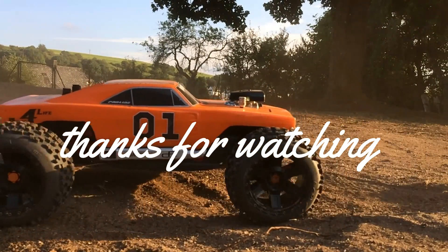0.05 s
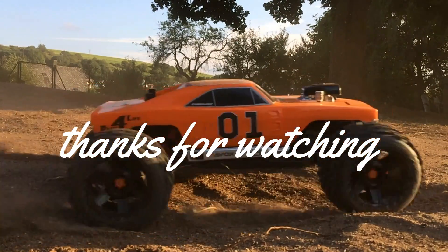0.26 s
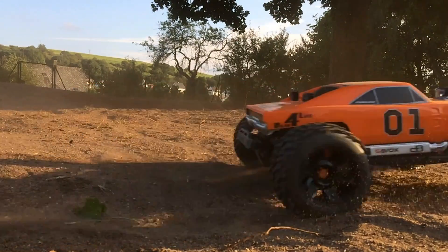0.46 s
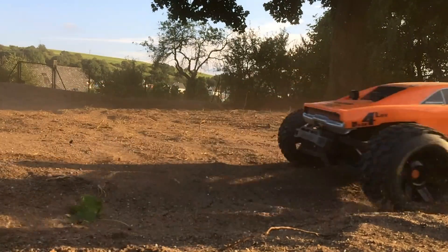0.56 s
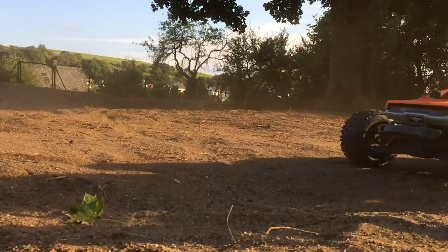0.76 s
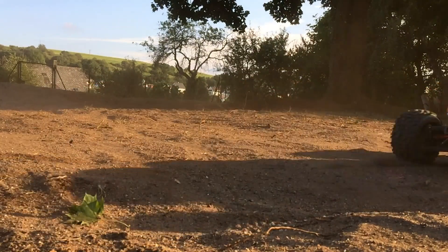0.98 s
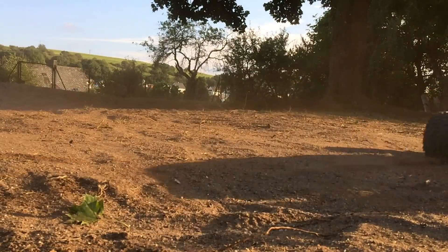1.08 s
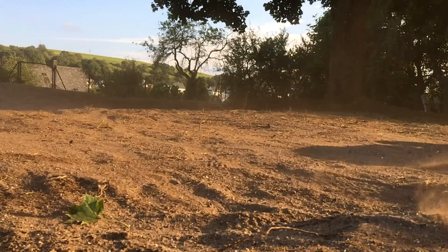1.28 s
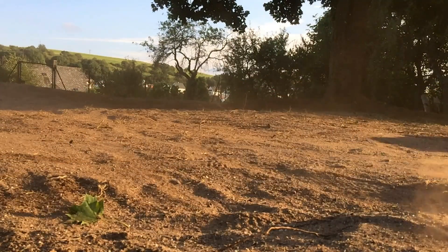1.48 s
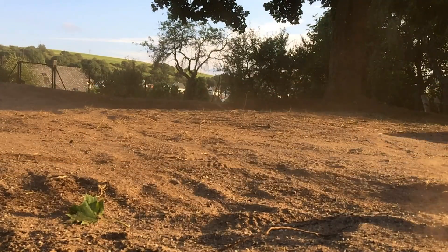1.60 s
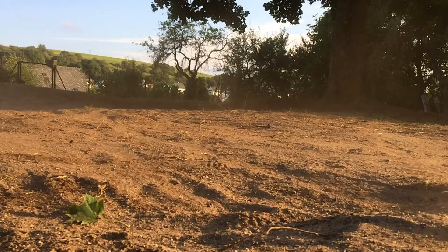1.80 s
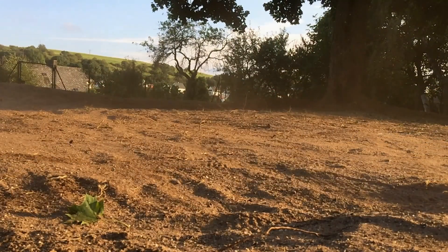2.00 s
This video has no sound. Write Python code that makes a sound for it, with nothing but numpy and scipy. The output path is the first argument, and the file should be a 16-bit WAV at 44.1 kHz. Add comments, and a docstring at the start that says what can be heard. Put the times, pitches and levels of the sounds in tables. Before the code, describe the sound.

Outdoors, near the microphone, a toy truck's gears squawk and whine upward, tyres rumble and fling grit, it eases off, then jolts into another raspy whining burst that breaks up and fades.

```python
"""Outdoors on loose dirt, a radio-controlled truck stutters, launches, coasts, then surges away.
Its brushless motor drives whining gears: gliding, rasping tones that set a plastic chassis ringing.
Random ticks make the drivetrain rattle; filtered noise and clicks make tyre rumble and thrown grit.
Short squawks, booming tyre bumps, a speed controller whistle, a faint chirp and quiet air complete it."""
import sys
import numpy as np
from scipy import signal
from scipy.fft import rfft, irfft
from scipy.io import wavfile

SR = 44100
rng = np.random.default_rng(int(sys.argv[2]) if len(sys.argv) > 2 else 0)


def output_pcm(signal):
    """Save a mono or channel-first signal as 16-bit PCM at the path in sys.argv[1].

    Samples are clipped to [-1, 1] before scaling.
    """
    pcm = np.clip(np.atleast_2d(signal).T, -1, 1) * 32767
    wavfile.write(sys.argv[1], SR, np.round(pcm).astype(np.int16))


N = 90404  # length in samples


def from_db(db):
    """Turn decibels into a gain."""
    return 10 ** (np.asarray(db) / 20)


def rms_one(x):
    """Scale a signal to an average strength (rms) of 1."""
    return x / np.sqrt(np.mean(x ** 2) + 1e-20)


def seconds():
    """Give the time of every sample."""
    return np.arange(N) / SR


def in_time(rows):
    """Join the points of a time table with straight lines; one curve per column after the time."""
    start_s, *columns = np.transpose(rows)
    return [np.interp(seconds(), start_s, column) for column in columns]


def coloured(x, points):
    """Shape the spectrum of a steady signal by a table of pitches and levels; rms 1."""
    pitch_hz, level_db = np.transpose(points)
    bins_hz = np.maximum(np.arange(N // 2 + 1) * SR / N, 1)
    shape_db = np.interp(np.log(bins_hz), np.log(pitch_hz), level_db)
    return rms_one(irfft(rfft(x) * from_db(shape_db), N))


def drift(rate_hz):
    """Make a smooth random wander of rms 1: noise that weakens above the given rate."""
    bins_hz = np.arange(N // 2 + 1) * SR / N
    noise = rng.standard_normal(N)
    return rms_one(irfft(rfft(noise) / (1 + (bins_hz / rate_hz) ** 2), N))


def ring(clicks, pitch_hz, t60_s):
    """Let clicks excite a resonance: a unit click starts a tone of height 1 that falls 60 dB in t60_s."""
    decay = from_db(-60 / (t60_s * SR))
    turn = 2 * np.pi * pitch_hz / SR  # radians per sample
    return signal.lfilter([.5, 0, -.5], [1, -2 * decay * np.cos(turn), decay * decay], clicks + 1e-18)


def grains(per_s, spread_db):
    """Scatter clicks at random times, with uneven sizes and random signs."""
    sizes = from_db(spread_db * np.minimum(rng.exponential(1, N), 4.5))
    happens = rng.random(N) < per_s / SR
    return sizes * rng.choice([-1, 1], N) * happens


TURN_S, TURN_LENGTH_S = 1.164, 0.32  # middle and length of the swing of the tail


def turned():
    """Follow the turn: 0 while the truck is side-on, 1 once its tail faces the listener."""
    return np.clip((seconds() - TURN_S) / TURN_LENGTH_S + .5, 0, 1)


def turning(x, side_on, tail_on):
    """Fade from the side-on colour to the tail-on colour as the truck turns away."""
    return (1 - turned()) * coloured(x, side_on) + turned() * coloured(x, tail_on)


# Colour of the open air: pitch_hz, level_db (relative)
AIR_COLOUR = [(30, 3), (70, 20), (150, -10), (1400, -49), (3500, -45), (15000, -24)]
AIR_DB = -56


def air():
    """Steady noise, strongest in the bass, stands for the open air."""
    return from_db(AIR_DB) * coloured(rng.standard_normal(N), AIR_COLOUR)


# Loudness of the speed controller whistle: start_s, level_db
WHISTLE = [(.76, -82), (.79, -48), (.945, -54), (.975, -33), (1.005, -31), (1.035, -42), (1.06, -100)]
WHISTLE_HZ, WHISTLE_WIDTH_HZ = 13870, 188


def controller():
    """Switching in the speed controller whistles: a narrow tone made unsteady by two random wanders."""
    phase = 2 * np.pi * WHISTLE_HZ * seconds()
    whistle = drift(WHISTLE_WIDTH_HZ / 2) * np.sin(phase) + drift(WHISTLE_WIDTH_HZ / 2) * np.cos(phase)
    return from_db(in_time(WHISTLE)[0]) * rms_one(whistle)


# Bumps hit by a hollow tyre: start_s, pitch_hz, level_db
BUMPS = [(0.274, 142.4, -30), (.413, 199.4, -31.5), (.507, 288, -25.5), (.515, 427, -24), (1.859, 80, -37)]
BUMP_T60_S = 0.17  # time to fall by 60 dB


def bumps():
    """Each bump sets the air in a hollow tyre booming: a low tone that dies away."""
    booms = np.zeros(N)
    for start_s, pitch_hz, level_db in BUMPS:
        age_s = np.maximum(seconds() - start_s, 0)
        level = from_db(level_db - 60 * age_s / BUMP_T60_S)
        booms = booms + level * np.sin(2 * np.pi * pitch_hz * age_s)
    return booms


# Loudness of the tyres on the ground: start_s, level_db
RUMBLE = [(.14, -56.5), (.22, -56), (.28, -36.5), (.37, -36), (.44, -28.5), (.52, -29.5), (.6, -45.5),
          (.68, -50.5), (.78, -43), (.99, -50), (1.035, -30.5), (1.25, -34), (1.5, -37), (1.56, -38.5),
          (1.78, -46.5), (1.93, -42), (2.05, -49)]
# Colour of that rumble: pitch_hz, level_db (relative)
RUMBLE_COLOUR = [(40, -15), (110, -8), (210, 2), (290, 2.5), (430, -2), (650, -5.5), (1500, -21.5)]


def tyre_rumble():
    """Knobbly tyres drum on the ground: low noise that follows a loudness curve."""
    return from_db(in_time(RUMBLE)[0]) * coloured(rng.standard_normal(N), RUMBLE_COLOUR)


# Loudness of grit thrown by the tyres: start_s, level_db
SPRAY = [(.15, -58), (.165, -45), (.224, -55.5), (.231, -30), (.3, -24), (.46, -28), (.58, -42),
         (.65, -54.5), (.76, -52), (.778, -42.5), (.86, -48), (.954, -50.5), (.959, -38), (1.022, -31),
         (1.029, -21.5), (1.1, -28), (1.28, -29), (1.34, -30), (1.385, -36.5), (1.445, -35.5),
         (1.462, -29.5), (1.51, -30.5), (1.55, -37), (1.61, -41.5), (1.665, -36), (1.7, -40), (1.92, -45.5),
         (2.05, -55)]
# Colour of the grit, side-on and then tail-on: pitch_hz, level_db (relative)
SPRAY_COLOUR = [(900, -36), (2000, -3), (2800, 0), (3600, -5.5), (5900, -2), (7900, -6.5), (11000, -14),
                (15300, -25)]
SPRAY_COLOUR_AWAY = [(900, -10), (2200, 1), (3200, -1), (4400, -5.5), (6300, -7), (9000, -10), (14200, -10)]
# Resonances of the thin side panels: pitch_hz, level_db (relative)
PANELS = [(3050, -3.5), (3880, -1), (4980, 1.5), (6500, -2), (7120, -6)]
PANEL_T60_S, GRIT_RING_DB = 0.028, -11  # fall by 60 dB; panel pings against the grit
GRAINS_PER_S, GRAIN_SPREAD_DB = 10000, 1.5


def grit_spray():
    """Tyres fling clumps of grit: dense random clicks, with panel pings that fade out over the turn."""
    grit = turning(grains(GRAINS_PER_S, GRAIN_SPREAD_DB), SPRAY_COLOUR, SPRAY_COLOUR_AWAY)
    pings = rms_one(sum(from_db(db) * ring(grit, hz, PANEL_T60_S) for hz, db in PANELS))
    grit_and_pings = grit + from_db(GRIT_RING_DB) * (1 - turned()) * pings
    clumps_db = 1.48 * drift(58)
    return from_db(in_time(SPRAY)[0] + clumps_db) * grit_and_pings


# Resonances of the plastic chassis, also used by jolts and whines: pitch_hz, level_db (relative), t60_s
CHASSIS = [(444, -6, 0.26), (577, -12.5, 0.13), (677, -11.5, 0.21), (810, 4.5, 0.18), (968, -10.5, .12),
           (1107, -7.5, 0.19), (1416, -4, 0.098), (1551, 0, .12), (1809, -6.5, 0.055)]
# Loudness of the drivetrain rattle under load: start_s, level_db
RATTLE = [(.148, -56.5), (.163, -30), (.2, -37), (.224, -37), (.231, -19.5), (.29, -21.5), (.35, -23),
          (.42, -24), (.47, -22), (.53, -32), (.6, -43.5), (.74, -45), (.78, -31), (.81, -39.5),
          (.955, -42), (.959, -35.5), (.99, -29.5), (1.018, -34), (1.032, -13.5), (1.06, -30.5),
          (1.15, -24), (1.22, -27.5), (1.37, -30), (1.425, -29), (1.475, -28.5), (1.56, -38), (1.62, -33),
          (1.665, -40.5), (1.71, -37.5), (1.93, -39), (2.05, -47)]
# Colour of the ticks, side-on and then tail-on: pitch_hz, level_db (relative)
RATTLE_COLOUR = [(200, -45), (420, -6), (700, 3.5), (1400, 2.5), (1900, -3), (2400, -5), (3000, -35),
                 (9000, -75)]
RATTLE_COLOUR_AWAY = [(200, -48), (420, -5), (700, -1), (1100, 1), (2400, -2), (3000, -10), (5000, -24),
                      (9000, -66)]
RATTLES_PER_S, RATTLE_SPREAD_DB = 2500, -1.5
CHASSIS_RING_DB = -8  # ringing against the ticks


def chassis_rattle():
    """Dense drivetrain ticks are heard directly and also set the plastic chassis ringing."""
    load = from_db(in_time(RATTLE)[0] + 1.08 * drift(21))
    ticks = grains(RATTLES_PER_S, RATTLE_SPREAD_DB)
    rings = np.zeros(N)
    for k, (pitch_hz, level_db, t60_s) in enumerate(CHASSIS):
        sign = (-1) ** k  # neighbouring resonances alternate in sign
        rings = rings + sign * from_db(level_db) * ring(ticks, pitch_hz, t60_s)
    direct = turning(ticks, RATTLE_COLOUR, RATTLE_COLOUR_AWAY)
    return load * (direct + from_db(CHASSIS_RING_DB) * rms_one(rings))


# Jolts through the chassis: start_s, level_db
JOLTS = [(0.256, -24), (0.773, -35.5), (1.027, -25.5), (1.032, -19.5)]


def chassis_jolts():
    """Each single jolt strikes every chassis resonance at once, with random signs."""
    start_s, jolt_db = np.transpose(JOLTS)
    out = np.zeros(N)
    for pitch_hz, level_db, t60_s in CHASSIS:
        clicks = np.zeros(N)
        clicks[(start_s * SR).astype(int)] = from_db(jolt_db + level_db) * rng.choice([-1, 1], len(start_s))
        out = out + ring(clicks, pitch_hz, t60_s)
    return out


# Short squawks of the gears: two in the stutter, three as they slip at launch: start_s, length_s, level_db
SNATCHES = [(0.159, 0.015, -31.5), (0.179, 0.029, -29.5), (0.298, 0.0026, -4), (0.31, 0.0038, -7.5),
            (0.321, .004, -12)]
SNATCH_HZ, SNATCH_ATTACK_S, SNATCH_RELEASE_S = 1385, 0.0018, 0.0022


def snatches():
    """The gears snatch as short squawks near 1.4 kHz, unsteady in pitch."""
    t = seconds()
    level = np.zeros(N)
    for start_s, length_s, level_db in SNATCHES:
        attack = np.clip((t - start_s) / SNATCH_ATTACK_S, 0, 1)
        release = np.exp(-np.maximum(t - start_s - length_s, 0) / SNATCH_RELEASE_S)
        level = level + from_db(level_db) * attack * release
    pitch_hz = SNATCH_HZ * (1 + 0.017 * drift(126))
    return level * rms_one(np.sin(2 * np.pi * np.cumsum(pitch_hz) / SR))


WHINE_WOBBLE, WHINE_ROUGH = 0.01805, 0.38  # spread of pitch and of level, as shares
WHINE_FLUTTER_PER_S, SKIRT_HZ = 110, 352  # rates of the level flutter and of the rasp


def gear_tone(pitch_hz, rasp_share):
    """Meshing teeth make a tone that wobbles in pitch, flutters in level and rasps on both sides."""
    phase = 2 * np.pi * np.cumsum(pitch_hz * (1 + WHINE_WOBBLE * drift(80.2))) / SR
    tone = (1 + WHINE_ROUGH * drift(WHINE_FLUTTER_PER_S)) * np.sin(phase)
    rasp = drift(SKIRT_HZ) * np.sin(phase) + drift(SKIRT_HZ) * np.cos(phase)
    return rms_one(tone + rasp_share * rasp)


def whine(curve, rasp_share, pairs=()):
    """A gliding gear tone sounds with its weaker partners for as long as its curve lasts."""
    t = seconds()
    pitch_hz, level_db = in_time(curve)
    tones = gear_tone(pitch_hz, rasp_share)
    for ratio, pair_db in pairs:
        tones = tones + from_db(pair_db) * gear_tone(ratio * pitch_hz, rasp_share)
    lasting = (t > curve[0][0]) * (t < curve[-1][0])
    return from_db(level_db) * rms_one(tones) * lasting


WHINE_RING_DB = 1  # gain of a chassis resonance when a whine meets its pitch


def through_chassis(x):
    """A tone wakes each chassis resonance that it passes, leaving a trail of rings."""
    rings = np.zeros(N)
    for pitch_hz, _, t60_s in CHASSIS:
        steady_gain_one = 2 * np.log(1000) / (t60_s * SR)
        rings = rings + ring(x, pitch_hz, t60_s) * steady_gain_one
    return x + from_db(WHINE_RING_DB) * rings


# Main gear whine, pitched at the tooth rate: start_s, pitch_hz, level_db
WHINE = [(.225, 479.6, -37), (.252, 634, -24), (.259, 760, -14.5), (.278, 968, -16), (.286, 1158, -14.5),
         (.312, 1403, -17), (.325, 1560, -9), (.338, 1590, -17.5), (.35, 1800, -21.5), (.372, 1860, -27),
         (.405, 1990, -47), (.52, 1760, -36), (.6, 1567, -51.5), (.95, 1570, -50.5), (.968, 1490, -31),
         (1.01, 1470, -45), (1.055, 1464, -15), (1.095, 1510, -23.5), (1.112, 1850, -27.5),
         (1.22, 2020, -39), (1.258, 1840, -22.5), (1.288, 1830, -27.5), (1.318, 2180, -26.5),
         (1.39, 2260, -53), (1.445, 2250, -38), (1.472, 2100, -24.5), (1.51, 2158, -29), (1.58, 2125, -51),
         (1.635, 2031, -32), (1.672, 2070, -30.5), (1.71, 2000, -43)]
# Other gear pairs on the same shaft, from the side and then from behind: speed_ratio, level_db (relative)
GEAR_PAIRS = [(.86, -10), (1.98, -13)]
GEAR_PAIRS_AWAY = [(.67, -10), (1.12, -8)]
# A lower whine as the truck pulls off: start_s, pitch_hz, level_db
FAR_WHINE = [(1.681, 1075, -72), (1.741, 1094, -49.5), (1.9, 1405, -44.5), (1.94, 1310, -42.5),
             (1.981, 1174, -47)]
# Upper whine of the motor in the second surge: start_s, pitch_hz, level_db
UPPER_WHINE = [(1.02, 4446, -30.5), (1.085, 4490, -28.5), (1.154, 3972, -31), (1.25, 4366, -29.5),
               (1.335, 4136, -32.5), (1.379, 4088, -63), (1.49, 4146, -28.5), (1.579, 3945, -59),
               (1.664, 3750, -36.5), (1.72, 3830, -56)]
# A faint chirp, likely the steering servo: start_s, pitch_hz, level_db
SERVO = [(.015, 5390, -57), (.04, 5310, -46.5), (.11, 5260, -57)]
# The servo's other gears: speed_ratio, level_db (relative)
SERVO_PAIRS = [(1.55, -2), (1.75, -5)]
SKIRT_SHARE, UPPER_RASP_SHARE = 0.24, 1.1  # rasp in the low tones and in the high tones


def gears():
    """Three whines glide with the throttle after a servo chirp; low ones ring the chassis, high ones rasp."""
    side_on = (1 - turned()) * whine(WHINE, SKIRT_SHARE, GEAR_PAIRS)
    tail_on = turned() * whine(WHINE, SKIRT_SHARE, GEAR_PAIRS_AWAY)
    low = through_chassis(side_on + tail_on + whine(FAR_WHINE, SKIRT_SHARE))
    upper = whine(UPPER_WHINE, UPPER_RASP_SHARE)
    servo = whine(SERVO, UPPER_RASP_SHARE, SERVO_PAIRS)
    return low + upper + servo


def scene():
    """Add up the open air and every part of the truck, as one channel."""
    ground = bumps() + tyre_rumble() + grit_spray()
    body = chassis_rattle() + chassis_jolts()
    drive = controller() + snatches() + gears()
    return (air() + ground + body + drive)[None]


MIC_LOW_CUT_HZ, CUTOFF_HZ = 75, 15400


def record(dry):
    """The microphone drops the deep bass, peaks are rounded, and the top is cut steeply."""
    low_cut = signal.butter(2, MIC_LOW_CUT_HZ, "high", fs=SR, output="sos")
    thinned = signal.sosfilt(low_cut, dry)
    rounded = 1.3 * np.tanh(thinned / 1.3)
    top_cut = signal.ellip(12, .2, 80, CUTOFF_HZ, fs=SR, output="sos")  # .2 dB ripple, 80 dB cut
    return signal.sosfilt(top_cut, rounded)


dry = scene()
out = record(dry)
output_pcm(out)
```